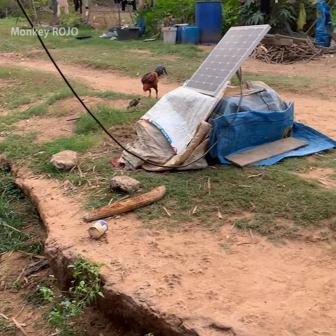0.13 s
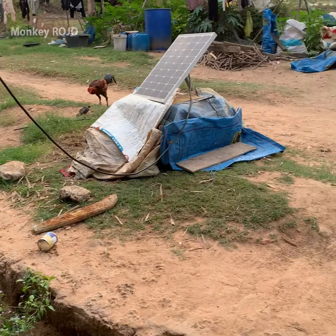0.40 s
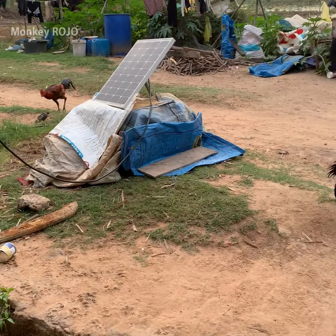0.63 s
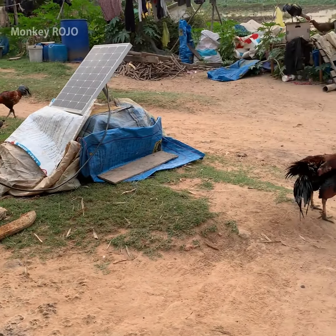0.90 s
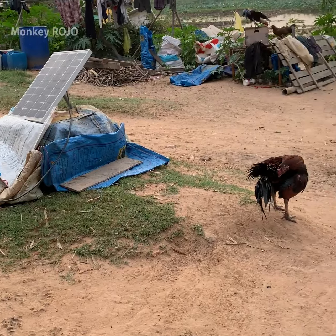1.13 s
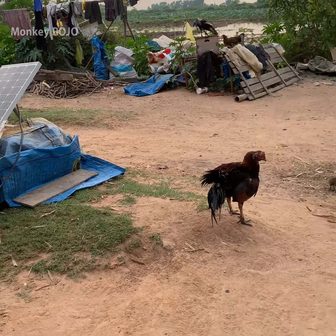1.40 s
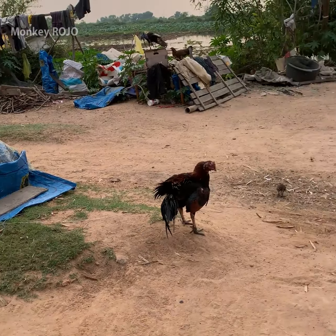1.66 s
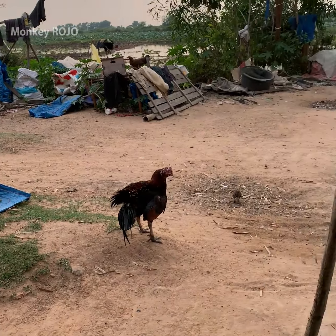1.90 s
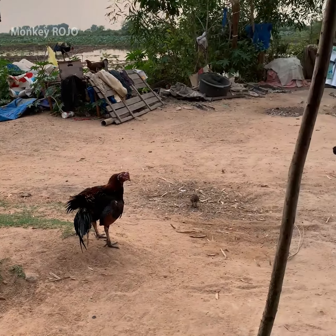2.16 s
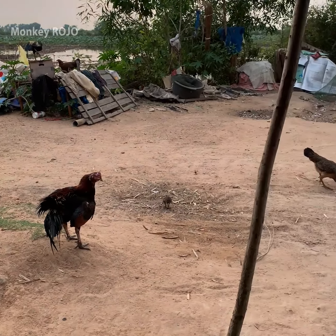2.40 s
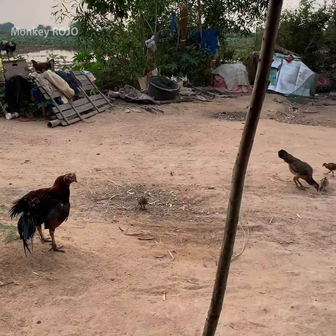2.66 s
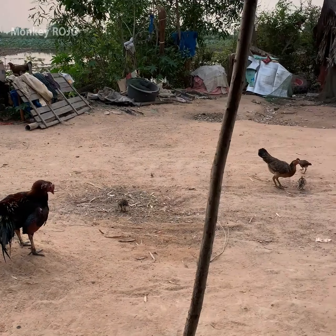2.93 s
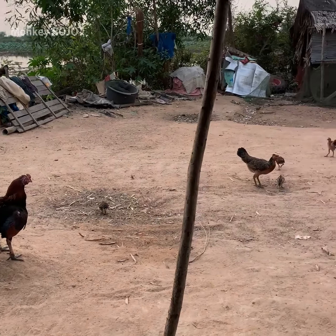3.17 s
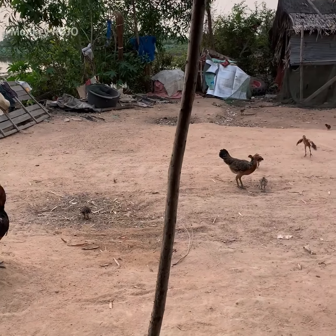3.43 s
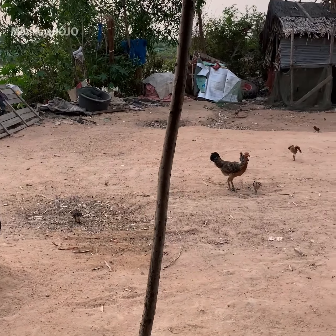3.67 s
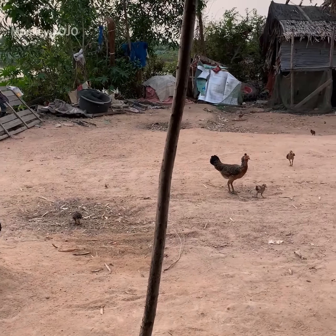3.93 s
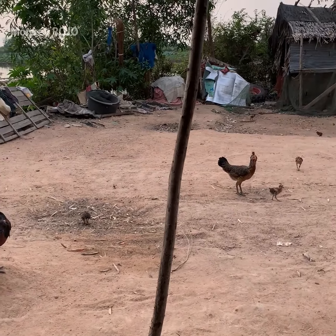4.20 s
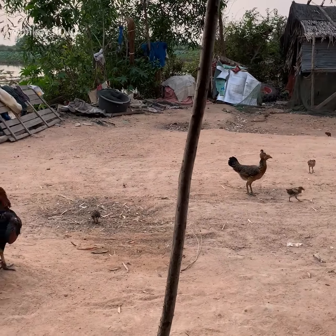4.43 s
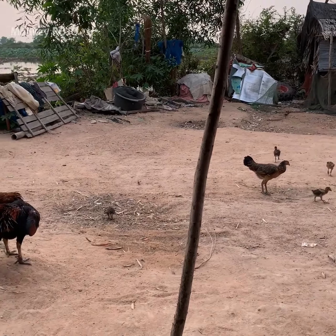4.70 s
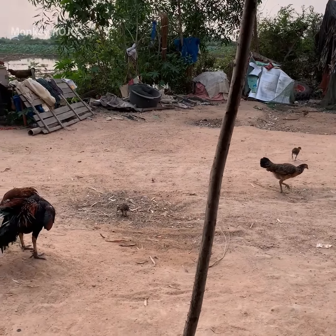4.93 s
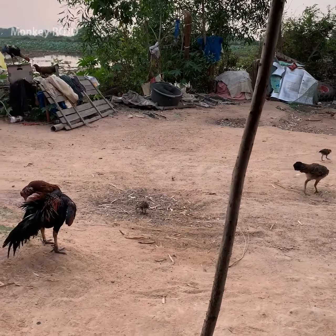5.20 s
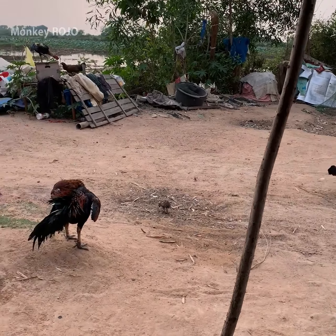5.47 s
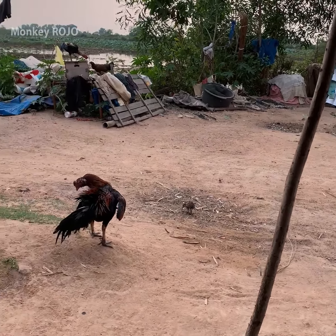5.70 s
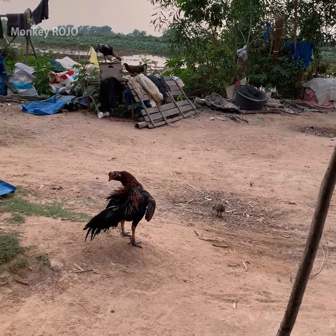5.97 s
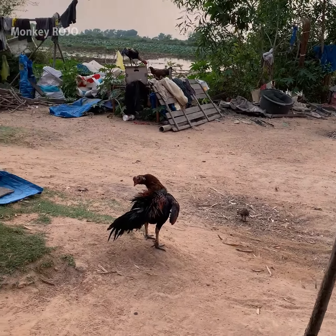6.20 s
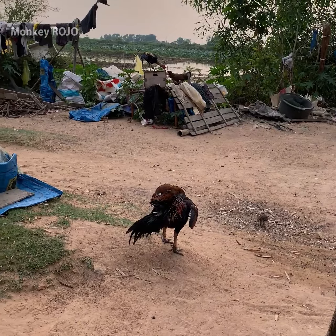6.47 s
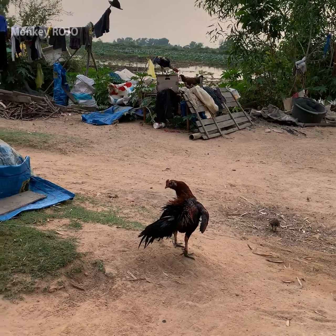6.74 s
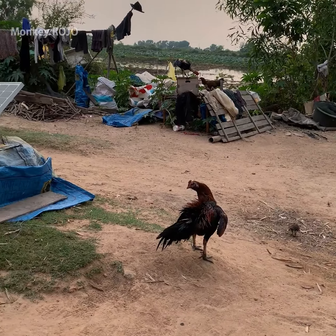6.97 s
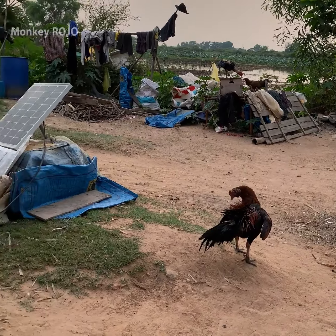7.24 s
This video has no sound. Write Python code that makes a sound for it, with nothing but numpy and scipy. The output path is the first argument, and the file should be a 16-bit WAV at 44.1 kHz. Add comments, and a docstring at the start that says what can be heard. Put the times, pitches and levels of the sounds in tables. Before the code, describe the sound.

An open dirt farmyard heard close through a hand-held stereo phone, with only a slight short echo from huts and trees. Chicks peep from start to end: tiny, bright whistles dropping quickly in pitch, mixed with longer, plaintive drooping ones, while fainter chicks answer behind. Wind rumbles low and unevenly on the microphones; insects and leaves add a thin hiss. Around 0.3-0.5 s gritty scuffs, finger rubs and soft low thumps hit the phone; more bumps come near 1.2, 1.6 and 2.1 s, then 3.2-4 s. Peeping grows louder and busier from 1.3 s. A hen clucks faintly at 1.75, 2.85, 3.9 and 6 s. A crisp claw scrape lands at 5.1 s. After 5.5 s a dull far engine swells and holds; two tiny ticks sound at 5.76 s. Softer soil scuffs come at 6.5 s, alongside a long falling peep, and the peeps become sparser.

```python
"""A dirt farmyard on a hand-held phone: a brood peeps throughout, as falling sines coloured by a throat curve.
Wind rumble and insect hiss, both coloured noise, lie underneath; from 0.3 s noise scuffs and rubs join low
sinking bumps on the case. More bumps, further out of step between the ports, come near 1.6 s and 2.1 s.
A hen clucks softly in harmonic stacks from 1.75 s. Past 5.5 s a far engine, dull noise, draws nearer,
two treble ticks sound, and claws scuff softer soil near 6.5 s."""
import sys
import numpy as np
from scipy import signal
from scipy.fft import rfft, irfft, next_fast_len
from scipy.io import wavfile
from scipy.ndimage import uniform_filter1d, map_coordinates

SR = 44100
rng = np.random.default_rng(int(sys.argv[2]) if len(sys.argv) > 2 else 0)


def voltage_ratio(decibels):
    """Convert decibels (scalar or array-like) to amplitude ratios, 20 dB per decade."""
    exponent = np.asarray(decibels, float) / 20
    return 10 ** exponent


def transcribe(u):
    """Save the signal u as a 16-bit wav file named by the first command-line argument.

    u: samples, shape (n,) or (channels, n), limited to [-1, 1]; the rate is SR.
    q: integer samples, one column per channel.
    """
    v = np.clip(np.atleast_2d(u).T, -1, 1)
    q = np.round(v * 32767).astype(np.int16)
    wavfile.write(sys.argv[1], SR, q)


N = 324576

# far engine, before its flutter: (t/s, level/dB)
ENGINE_LEVEL = [(0, -80.5), (5.5, -77), (6.2, -60), (7.36, -60.5)]
# engine noise colour, relative: (f/Hz, density/dB per Hz)
ENGINE_COLOUR = [(120, -8), (200, 10.5), (300, 5.5), (400, -18), (750, -50), (1100, -71)]
# wind rumble, before its lumps: (t/s, level/dB)
WIND_LEVEL = [(0, -49.5), (1.54, -51.5), (2.33, -53.5), (3.77, -51), (7.36, -51.5)]
# wind noise colour, relative: (f/Hz, density/dB per Hz)
WIND_COLOUR = [(12, -108), (20, -41), (56, 1.5), (75, 5.5), (258, -11.5), (544, -35), (700, -45),
               (910, -59), (1540, -120)]
# insect and leaf hiss colour, relative: (f/Hz, density/dB per Hz)
HISS_COLOUR = [(290, -62), (500, -1), (1080, -11.5), (3020, -10.5), (3750, -4.5), (4340, -23.5),
               (5020, 3.5), (6420, -11.5), (9360, -6.5), (11300, -13.5), (11700, -16.5), (12250, -37),
               (13100, -14), (15100, -19.5), (16000, -9)]
# finger rubs on the case, falling 19 dB in each length: (t/s, level/dB, length/s)
RUBS = [(0.382, -58, 0.07), (0.433, -60, 0.036), (0.455, -58.5, 0.13), (1.23, -52, 0.014),
        (3.494, -55, 0.093), (3.75, -48.5, 0.04), (3.78, -47.5, 0.048), (5.767, -65, 0.04),
        (6.105, -57, 0.023)]
# colour of skin on the case, relative: (f/Hz, level/dB)
SKIN_COLOUR = [(1500, -7), (3000, 1.5), (6000, -10), (10000, -1.5), (12200, -5), (14500, 0), (16000, 4)]
# tiny treble ticks of the case: (t/s, level/dB)
TICKS = [(5.76, -60), (5.766, -53)]
# colour of the ticks, relative: (f/Hz, level/dB)
TICK_COLOUR = [(12500, -30), (13500, 0), (16000, 0)]
# bumps on the case: (t/s, envelope peak level/dB, start f/Hz, t60/s)
BUMPS = [(.349, -30.5, 130, 0.18), (0.425, -27.5, 152, 0.0079), (0.436, -25.5, 193, 0.13),
         (1.175, -40, 157, 0.092), (1.275, -40.5, 102, 0.44), (2.072, -39, 110, 0.19),
         (2.625, -39, 185, 0.19), (3.243, -24.5, 228, 0.18), (3.384, -37, 121, 0.11),
         (3.727, -30, 167, 0.19), (3.814, -32.5, 123, 0.17), (3.955, -36, 132, 0.14)]
# bumps further out of step between the ports: (t/s, envelope peak level/dB, start f/Hz, t60/s)
SKEWED_BUMPS = [(1.572, -30.5, 114, 0.13), (1.632, -36.5, 141, 0.073), (1.647, -39, 387, 0.063),
                (2.106, -37, 377, 0.13), (2.114, -22, 150, 0.075)]
# scuffs in the dirt: (t/s, grit level/dB, knock level re grit/dB, t60/s)
SCUFFS = [(.287, -53, -4, 0.042), (0.333, -47, -5, 0.039), (0.375, -57, 12.5, 0.18),
          (0.943, -71.5, 17, 0.17), (1.171, -54, -19, 0.14), (1.626, -74.5, 24.5, 0.058),
          (2.107, -72, 27, 0.047), (3.488, -59.5, 16, 0.14), (3.507, -50, 16, 0.045),
          (3.738, -57, 13, 0.17), (3.872, -47.5, -27, 0.017), (3.923, -52, -6, 0.046),
          (5.097, -39.5, -19, 0.04), (5.108, -50, 5.5, 0.056)]
# duller scuffs in soft soil: (t/s, grit level/dB, knock level re grit/dB, t60/s)
SOFT_SCUFFS = [(6.513, -47, 1.5, 0.089), (6.524, -41, -11, 0.022), (6.557, -41.5, -1.5, 0.041),
               (6.57, -63, 12, 0.038)]
# grit colour, relative, f scaled down for soft soil: (f/Hz, level/dB)
GRIT_COLOUR = [(500, -8), (800, 9.5), (1200, 9), (1700, 6), (2150, -20), (2700, -6.5), (3300, -24),
               (6000, -89)]
# dull knock of the ground, relative: (f/Hz, level/dB)
KNOCK_COLOUR = [(200, 1.5), (330, -3.5), (440, 5.5), (560, -5.5), (800, -56.0)]
# hen clucks: (t/s, length/s, start f/Hz, end f/Hz, throat f/Hz, level before the stack/dB)
CLUCKS = [(1.753, 0.094, 365, 391, 1297, -62.5), (2.854, 0.11, 742, 939, 855, -66),
          (3.898, 0.012, 505, 513, 1560, -50), (3.918, 0.023, 526, 480, 1520, -56),
          (5.968, 0.064, 438, 391, 1320, -56)]
# peeps that slide from the first moment, nominal: (t/s, length/s, start f/Hz, end f/Hz, level/dB)
SLIDES = [(0, 0.041, 4870, 2860, -59), (.06, 0.044, 7140, 4960, -56), (0.101, 0.059, 4150, 2940, -64),
          (0.12, 0.038, 7450, 6400, -63), (0.24, 0.069, 4880, 4060, -59.5),
          (0.401, 0.094, 5700, 4360, -62.5), (0.425, 0.079, 4300, 3140, -63.5),
          (0.451, 0.089, 4760, 3730, -65), (0.499, 0.071, 5100, 4250, -60.5),
          (.665, 0.059, 4590, 2860, -60.5), (0.735, 0.027, 4920, 4140, -52),
          (.785, 0.035, 5300, 4250, -55.5), (0.837, 0.048, 7140, 6370, -64), (.9, 0.064, 5230, 4640, -57.5),
          (0.968, 0.046, 4830, 3750, -67), (1.155, 0.04, 5620, 4200, -56),
          (1.203, 0.068, 7600, 6200, -63.5), (1.211, 0.024, 4200, 3030, -59),
          (1.281, 0.074, 5370, 3610, -49), (1.399, 0.076, 5640, 3180, -52.5),
          (1.426, 0.056, 5560, 4290, -61), (1.469, 0.071, 4300, 3770, -60), (1.474, 0.066, 8550, 7370, -62),
          (1.53, 0.081, 6300, 3580, -46.5), (1.667, 0.053, 4670, 3010, -55.5),
          (1.702, 0.064, 5400, 3400, -50.5), (1.717, 0.048, 9200, 7400, -58.5),
          (1.775, 0.051, 7450, 7200, -58.5), (1.818, 0.094, 6730, 3500, -47),
          (2.009, 0.081, 6840, 5880, -57), (2.095, 0.046, 6000, 3800, -60),
          (2.131, 0.091, 3900, 2950, -53.5), (2.129, 0.089, 8240, 5970, -58),
          (2.241, 0.058, 4270, 3670, -55.5), (2.35, 0.077, 7290, 5480, -51),
          (2.407, 0.072, 5640, 3970, -46), (2.413, 0.065, 5130, 2800, -48), (2.556, .012, 6300, 5600, -46),
          (2.56, 0.093, 7340, 5970, -60.5), (2.659, 0.057, 5100, 4020, -50), (2.73, 0.096, 6020, 3880, -46),
          (2.866, 0.087, 5790, 3890, -51), (2.981, 0.042, 4340, 3570, -56),
          (3.118, 0.049, 5270, 3930, -47.5), (3.187, 0.036, 5870, 4400, -49.5),
          (3.214, 0.025, 4580, 3640, -48), (3.22, 0.045, 6830, 5440, -58),
          (3.276, 0.057, 5800, 3950, -55.5), (3.335, 0.063, 3800, 2950, -51.5),
          (3.557, 0.038, 5470, 4600, -49.5), (3.593, 0.035, 4350, 2980, -56),
          (3.812, 0.11, 5070, 3305, -50), (3.856, 0.052, 6650, 5860, -57),
          (3.878, 0.037, 4720, 3840, -56.5), (3.924, 0.083, 5840, 3540, -45),
          (3.89, 0.029, 7370, 6700, -56), (4.041, 0.053, 4870, 2940, -55), (4.123, 0.076, 6970, 4130, -51),
          (4.188, 0.079, 6710, 3560, -44.5), (4.437, 0.066, 4820, 3100, -51),
          (4.49, 0.042, 7150, 5600, -62), (4.53, 0.062, 5400, 3200, -60), (4.541, 0.042, 5460, 4660, -48),
          (4.703, 0.042, 6360, 5240, -50), (4.796, 0.036, 4790, 3530, -44),
          (4.854, 0.053, 4590, 3410, -50.5), (4.954, 0.069, 5550, 3660, -55),
          (5.119, 0.11, 6850, 3960, -48.5), (5.197, 0.083, 5700, 5570, -61),
          (5.223, 0.038, 7140, 6000, -63), (5.374, 0.048, 8550, 4870, -54),
          (5.398, 0.026, 8160, 7200, -53.5), (5.414, 0.025, 5040, 3940, -50.5),
          (5.441, 0.077, 6670, 3860, -43.5), (5.599, 0.046, 4380, 3500, -50),
          (5.565, 0.04, 8970, 5600, -58.5), (5.604, 0.052, 6200, 4430, -50.5),
          (5.787, 0.044, 4530, 3150, -60), (5.955, 0.027, 8370, 7050, -57), (5.973, 0.057, 5720, 4340, -55),
          (6.177, 0.08, 5410, 3530, -54.5), (6.282, 0.04, 8820, 6750, -54), (6.325, 0.035, 4830, 2930, -63),
          (6.337, 0.029, 4620, 3750, -59), (6.38, 0.061, 5840, 5450, -67.5),
          (6.338, 0.049, 9550, 7500, -60), (6.388, 0.064, 7020, 6200, -65.5),
          (6.446, 0.065, 5300, 4070, -52), (6.513, 0.052, 5140, 4360, -54), (6.732, 0.3, 5330, 4915, -64),
          (6.979, 0.11, 7500, 5270, -62.5), (7.045, 0.069, 5350, 3690, -53.5),
          (7.107, 0.053, 5140, 3840, -52.5), (7.342, 0.022, 5500, 4110, -51.5)]
# peeps held level, drooping as the breath runs out, nominal: (t/s, length/s, start f/Hz, end f/Hz, level/dB)
HELD = [(.103, 0.12, 5310, 4550, -54.5), (.305, 0.055, 6730, 5730, -63), (.517, 0.067, 4420, 3620, -62),
        (.557, 0.11, 5200, 4230, -65), (1.054, 0.076, 7260, 6800, -68.5), (1.175, 0.18, 5020, 3970, -61.5),
        (1.585, 0.12, 6810, 5700, -63), (1.61, 0.17, 5400, 5000, -56.5), (1.69, 0.17, 5195, 4230, -57.5),
        (1.94, 0.15, 4440, 4330, -73), (2, 0.056, 5500, 3600, -67), (2.118, 0.049, 7080, 6860, -63),
        (2.162, 0.092, 5500, 4460, -52.5), (2.255, 0.097, 5370, 3490, -53), (2.27, 0.15, 5110, 3040, -56.5),
        (2.508, 0.1, 4580, 4510, -65), (2.331, 0.1, 6580, 5710, -54.5), (2.687, 0.034, 7800, 6670, -50.5),
        (3.48, 0.074, 7350, 4330, -62.5), (3.541, 0.034, 4497, 3650, -44), (3.03, 0.11, 5425, 4930, -64.5),
        (3.665, 0.26, 5150, 4600, -65.5), (3.7, 0.22, 5370, 4870, -62), (3.804, 0.034, 4450, 3520, -51.5),
        (3.849, 0.089, 4860, 4060, -52), (3.922, 0.091, 6680, 5770, -58.5),
        (4.04, 0.098, 5610, 4080, -55.5), (4.155, 0.026, 7900, 7220, -53), (4.26, 0.18, 5465, 3530, -57.5),
        (4.42, 0.089, 6930, 5600, -67), (4.58, 0.2, 5140, 3920, -58.5), (4.735, 0.054, 5630, 4620, -43),
        (4.845, 0.14, 5465, 3810, -56), (5.093, 0.04, 7900, 6940, -55), (5.197, .12, 5290, 4410, -54),
        (5.485, 0.13, 5000, 4600, -61), (5.66, 0.12, 5330, 4540, -55.5), (5.895, 0.1, 7300, 6260, -65),
        (6.02, 0.071, 5430, 5160, -58), (6.04, 0.12, 5150, 3640, -59.5), (6.24, 0.077, 5360, 4740, -59.5),
        (6.597, 0.39, 5245, 2784, -58), (6.91, 0.16, 5330, 5200, -62), (7.155, 0.084, 5650, 5150, -61),
        (7.26, 0.063, 7600, 6000, -65)]
# a chick's beak and throat: (f/Hz, gain/dB)
THROAT = [(3000, -4), (3800, 0), (4450, 6.5), (5100, 1.5), (6100, 1), (7500, -6), (9500, -7), (12000, -33)]
# a chick's overtone by its own pitch, before scatter: (f/Hz, level re the whistle/dB)
OCTAVE = [(6500, -40), (8000, -17), (9500, -15), (11500, -40)]
# how fast the yard's answer dies: (f/Hz, t60/s)
YARD_DECAY = [(500, 0.24), (12000, 0.16)]
# phase between the ports: (f/Hz, left lead/rad)
PORT_LEAD = [(40, .4), (110, -.9), (300, -2.7), (430, -4.9), (600, -3.4), (1100, -1.8), (1600, -.5),
             (2200, -1.2), (3750, -1.5), (4100, -4.7), (5000, -4.3), (6000, -3.2), (8000, -.8),
             (11000, 2.2), (15000, 6.1)]
# balance between the ports: (f/Hz, left minus right level/dB)
PORT_TILT = [(200, 1), (3800, -1), (12000, 0)]

HISS_DB, HISS_SWELL_DB, HISS_PATCHY_DB = -67.5, 1.4, 3.3  # base level, slow swell, drifting patches
BUMP_LEAD_RAD, SKEWED_LEAD_RAD = 1.2, 4.44  # how far left leads right
SOFTNESS = 0.74  # soft soil: grit colour sits lower in frequency by this factor
SLIDE_SAG, HELD_SAG = .95, .22  # share of the fall spread evenly; the rest comes in the last droop
DROOP_S, DROOP_SHARE = .009, .065  # droop time constant: a fixed part plus a share of the call
FADE_S = .01  # fade at either end
SCOOP_HZ, SCOOP_S = 500, .006  # start from below, scaled by 1 - sag, and its time constant
# throat resonances a sliding pitch clings to: centre, width, and a pull scaled by sag
LINGER_HZ, LINGER_WIDTH_HZ, LINGER_PULL = 4400, 500, .6
STEP_HZ, STEP_WIDTH_HZ, STEP_PULL = 5650, 450, .5
ANSWER_S = .08  # far chicks join within this time
OPPOSITE = np.array([[1], [-1]])  # left up, right down


def unit(x):
    """Scales to rms 1."""
    return x / np.sqrt(np.mean(x ** 2) + 1e-20)


def along(points, hz):
    """Reads (f/Hz, value) points on a log frequency axis."""
    f, v = np.transpose(points)
    return np.interp(np.log(hz + 1), np.log(f + 1), v)


def wobble(rate, count=N):
    """Draws a smooth random curve, rate knots a second."""
    knots = rng.standard_normal(int(count * rate / SR) + 4)
    return map_coordinates(knots, [np.arange(count) * rate / SR])


def filtered(x, response):
    """Multiplies the spectrum of x by a complex response of frequency."""
    m = next_fast_len(N + 8192)
    return irfft(rfft(x, m) * response(np.fft.rfftfreq(m, 1 / SR)), m)[..., :N]


def pair(colour, shared):
    """Two noises of this colour, jointly at rms 1, with a share of their power in common."""
    shared = np.clip(shared, 0, 1)
    noise = rng.standard_normal((3, N))
    both = np.sqrt(shared) * noise[0] + np.sqrt(1 - shared) * noise[1:]
    return unit(filtered(both, lambda hz: voltage_ratio(along(colour, hz))))


def patchy(x, depth_db):
    """Lets random patches of gain drift over time and frequency."""
    z = signal.stft(x, nperseg=512)[2]
    field = rng.standard_normal(z.shape[1:])
    field = uniform_filter1d(field, size=8, axis=0)
    field = uniform_filter1d(field, size=12, axis=1)
    return signal.istft(z * voltage_ratio(depth_db * unit(field)), nperseg=512)[1][:, :N]


def add(track, s, sound):
    """Mixes a sound in at s seconds."""
    at = max(round(s * SR), 0)
    track[..., at:at + sound.shape[-1]] += sound[..., :max(N - at, 0)]


def drone():
    """A far engine as dull noise, blurred by distance, with a slight flutter of level."""
    s, db = np.transpose(ENGINE_LEVEL)
    level_db = np.interp(np.arange(N) / SR, s, db) + 0.56 * wobble(5.5)
    return voltage_ratio(level_db) * pair(ENGINE_COLOUR, 0.15)


def wind():
    """Wind rumbles in lumps on the ports: low noise whose level wanders."""
    s, db = np.transpose(WIND_LEVEL)
    level_db = np.interp(np.arange(N) / SR, s, db) + 3.4 * wobble(9)
    return voltage_ratio(level_db) * patchy(pair(WIND_COLOUR, 0.72), depth_db=1.5)


def insects_and_leaves():
    """Far insects and leaves blend into a lasting hiss that swells gently and drifts in colour."""
    level_db = HISS_DB + HISS_SWELL_DB * wobble(3.66)
    return voltage_ratio(level_db) * patchy(pair(HISS_COLOUR, 0.28), depth_db=HISS_PATCHY_DB)


def rubs():
    """Skin slides on the case in short bright brushes: grainy noise that starts fast and dies away."""
    stroke = np.zeros(N)
    for s, db, length in RUBS:
        u = np.arange(round(4 * length * SR)) / SR / length
        add(stroke, s, voltage_ratio(db) * np.minimum(u * 16, 1) * np.exp(-2.2 * u))
    grain = voltage_ratio(5.5 * wobble(220))
    return stroke * grain * pair(SKIN_COLOUR, 0.9)


def ticks():
    """Tiny bursts of noise at the very top of the band, dying 60 dB in 20 ms."""
    shape, t = np.zeros(N), np.arange(SR // 50) / SR
    for s, db in TICKS:
        add(shape, s, voltage_ratio(db - 60 * t / .02))
    return shape * pair(TICK_COLOUR, .8)


def bumps():
    """Soft pushes on the case: a few cycles whose pitch sinks as they die, reaching the ports out of step."""
    out, t = np.zeros((2, N)), np.arange(SR // 6) / SR
    for table, lead in (BUMPS, BUMP_LEAD_RAD), (SKEWED_BUMPS, SKEWED_LEAD_RAD):
        for s, db, start_hz, t60 in table:
            # the pitch settles around 62 Hz
            hz = 62 + (start_hz - 62) * np.exp(-t / 0.01424) + 12 * wobble(49, count=len(t))
            attack = (1 - np.exp(-t / 0.0034)) ** 3
            shape = attack * voltage_ratio(-60 * t / t60 + 3.4 * wobble(68, count=len(t)))
            turn = 2 * np.pi * np.cumsum(hz) / SR
            add(out, s, voltage_ratio(db) * shape / shape.max() * np.sin(turn + lead / 2 * OPPOSITE))
    return out


def scuffs():
    """Claws drag clumps of grit, as ragged noise bursts, each with a dull knock of the ground."""
    out, t = np.zeros((2, N)), np.arange(SR // 5) / SR
    for table, shift in (SCUFFS, 1), (SOFT_SCUFFS, SOFTNESS):
        grit, knock = np.zeros(N), np.zeros(N)
        for s, db, knock_db, t60 in table:
            clumps_db = 4.5 * wobble(250, count=len(t))
            shape = (1 - np.exp(-t / .0015)) * voltage_ratio(-60 * t / t60 + clumps_db)
            add(grit, s, voltage_ratio(db) * shape)
            add(knock, s, voltage_ratio(db + knock_db) * shape)
        out += grit * pair(np.multiply(GRIT_COLOUR, [shift, 1]), 0.58)
        out += knock * pair(KNOCK_COLOUR, 0.59)
    return out


def hen():
    """A low harmonic stack; the throat favours the overtones near its resonance."""
    out = np.zeros(N)
    for s, length, start_hz, end_hz, throat_hz, db in CLUCKS:
        u = np.linspace(0, 1, round(length * SR))
        hz = start_hz + (end_hz - start_hz) * u
        turn = 2 * np.pi * np.cumsum(hz) / SR
        stack = sum(np.sin(k * turn) / (1 + ((k * hz - throat_hz) / 200) ** 4) for k in range(1, 8))
        hoarse = voltage_ratio(db + 3.5 * wobble(160, count=len(u)))
        add(out, s, hoarse * np.sin(np.pi * u) ** 0.2 * stack)
    return out


def peep(length, start_hz, end_hz, db, sag):
    """One breath through the syrinx: a falling sine with a weak octave, coloured by the throat as it passes."""
    n = round(length * SR)
    u = np.linspace(0, 1, n)
    pace = length / (DROOP_S + DROOP_SHARE * length)
    droop = np.expm1(u * pace) / np.expm1(pace)
    fall = sag * u + (1 - sag) * droop
    scoop = (1 - sag) * SCOOP_HZ * np.exp(-u * length / SCOOP_S)
    hz = start_hz - (start_hz - end_hz) * fall - scoop
    resonances = (LINGER_HZ, LINGER_WIDTH_HZ, LINGER_PULL), (STEP_HZ, STEP_WIDTH_HZ, STEP_PULL)
    for centre_hz, width_hz, pull in resonances:
        hz = hz - sag * pull * (hz - centre_hz) * np.exp(-((hz - centre_hz) / width_hz) ** 2)
    turn = 2 * np.pi * np.cumsum(hz * (1 + 0.005 * wobble(60, count=n))) / SR
    edges = np.clip(np.minimum(u, 1 - u) * length / FADE_S, 0, 1)
    # throat gain at mid-call is taken off, so the level refers to that pitch
    level_db = db - along(THROAT, hz[n // 2])
    swell = edges * voltage_ratio(level_db + 3 * wobble(45, count=n) + 2 * wobble(250, count=n))
    # the octave is stronger in slides, which are pushed hard
    octave_db = along(OCTAVE, 2 * hz) - 12 * (1 - sag) + 4 * rng.normal()
    return swell * (voltage_ratio(along(THROAT, hz)) * np.sin(turn) + voltage_ratio(octave_db) * np.sin(2 * turn))


def chicks():
    """The near peeps, each from its own spot, and farther chicks that answer slides picked at random."""
    out = np.zeros((2, N))
    for table, sag in (SLIDES, SLIDE_SAG), (HELD, HELD_SAG):
        for s, length, start_hz, end_hz, db in table:
            spot = voltage_ratio(3.5 * rng.normal() * OPPOSITE)
            add(out, s, peep(length, start_hz, end_hz, db, sag) * spot)
    cues = np.transpose(SLIDES)[0]
    for which, lag, length, top, fall, loud, side in rng.random((400, 7)):
        start_hz = 4800 + 3800 * top ** 3
        end_hz = start_hz - 400 - 1000 * fall
        call = peep(.02 + .045 * length, start_hz, end_hz, -78 + 10 * loud, SLIDE_SAG)
        spot = voltage_ratio(6.0 * (side - 1) * OPPOSITE)  # leaning right
        add(out, cues[int(which * len(cues))] + ANSWER_S * lag, call * spot)
    return out


def ground_bounce(x):
    """One reflection off the hard ground, about 3 ms late on the left and 4 ms on the right."""
    return np.array([np.roll(x[0], 130), np.roll(x[1], 190)])


def yard(x):
    """Huts and trees answer, each frequency dying at its own speed; the answer is new every quarter second."""
    out, step = np.zeros((2, N)), SR // 4
    for at in range(0, N, step):
        hz, t, z = signal.stft(rng.standard_normal((2, SR // 3)), SR, nperseg=256)
        decay = voltage_ratio(-60 * t / along(YARD_DECAY, hz)[:, None])
        tail = signal.istft(z * decay, SR, nperseg=256)[1]
        tail = tail / np.linalg.norm(tail[0])
        add(out, at / SR + .006, signal.fftconvolve(x[:, at:at + step], tail, axes=1))
    return out


def scene():
    """Birds and dirt sound in the yard; hand and wind act on the phone itself."""
    birds = chicks()
    outdoors = birds + voltage_ratio(-12.5) * ground_bounce(birds) + hen() + scuffs()
    reflected = voltage_ratio(-12.5) * yard(outdoors)
    handling = bumps() + rubs() + ticks()
    background = wind() + insects_and_leaves() + drone()
    return outdoors + reflected + handling + background


def band_limit(x):
    """A steep low-pass at the top of the band."""
    return signal.sosfilt(signal.butter(12, 16200, fs=SR, output="sos"), x)


def record(dry):
    """The two ports differ in phase and level with frequency; a band limit cuts off the top."""
    side = OPPOSITE / 2

    def port_response(hz):
        """Splits tilt and lead evenly between the ports, with nothing from 15750 Hz up."""
        return (hz < 15750) * voltage_ratio(side * along(PORT_TILT, hz)) * np.exp(1j * side * along(PORT_LEAD, hz))

    mix = filtered(dry, port_response)
    return band_limit(mix)


dry = scene()
out = record(dry)
transcribe(out)
```